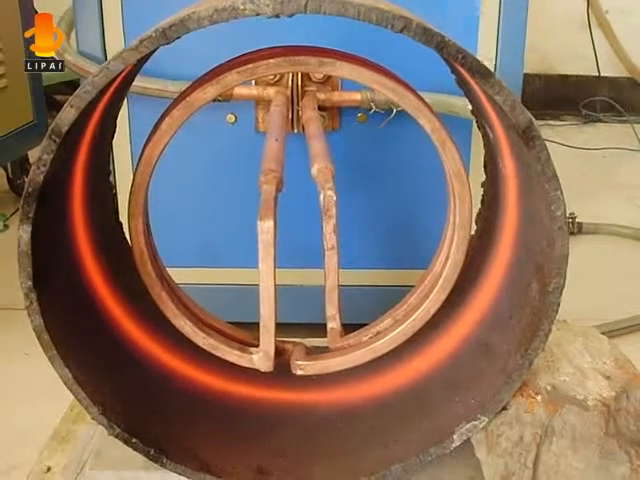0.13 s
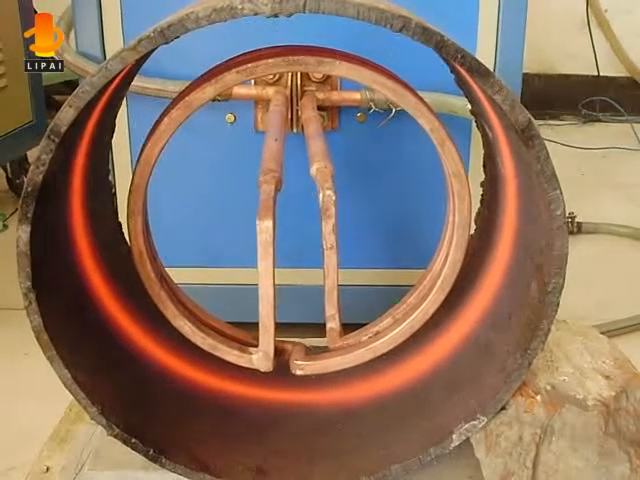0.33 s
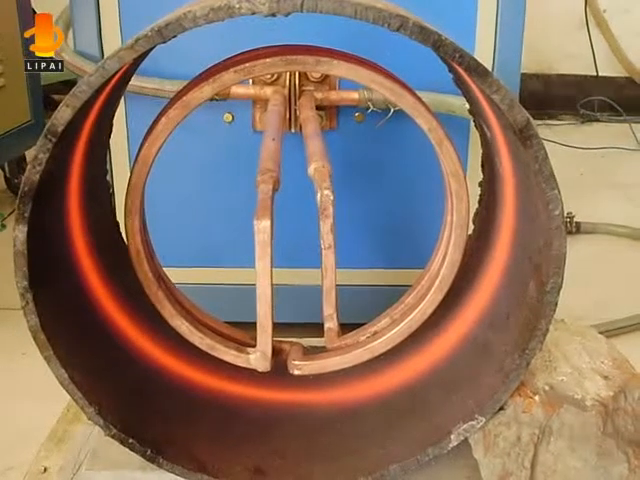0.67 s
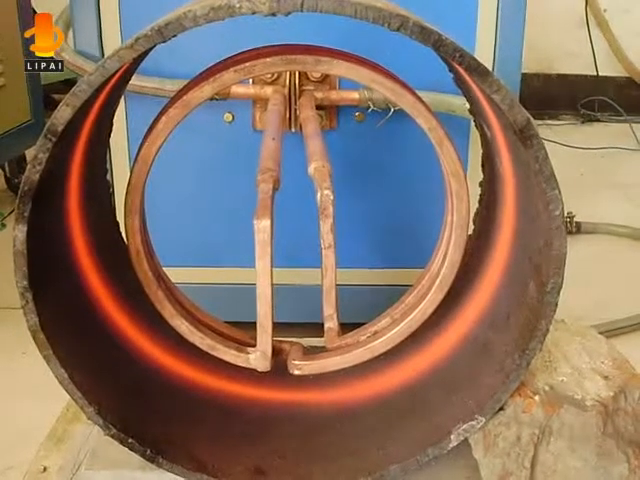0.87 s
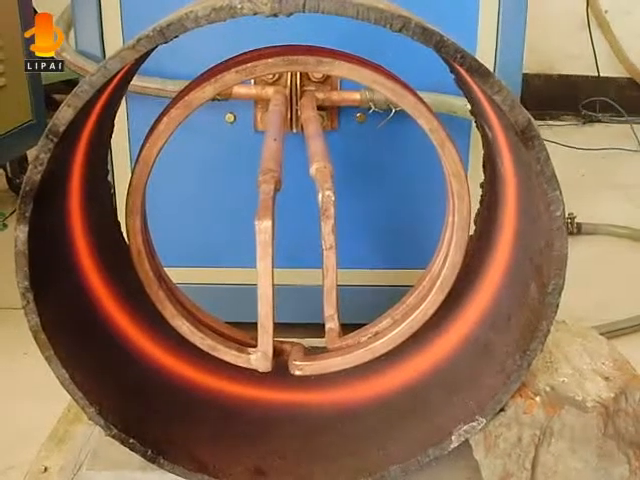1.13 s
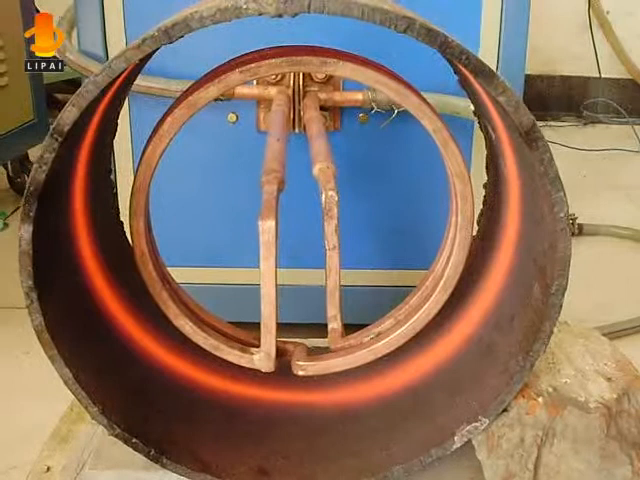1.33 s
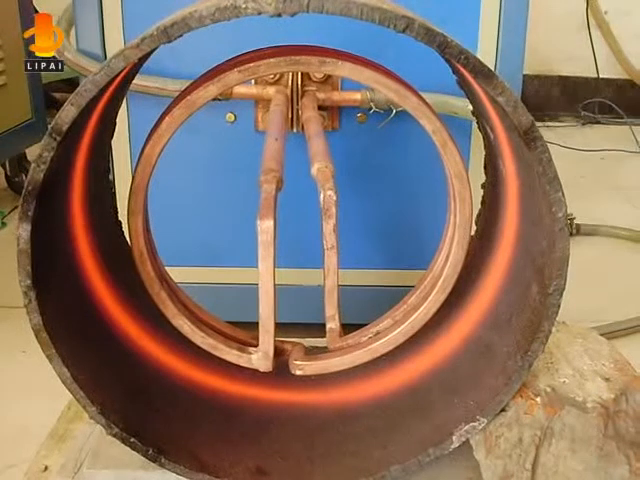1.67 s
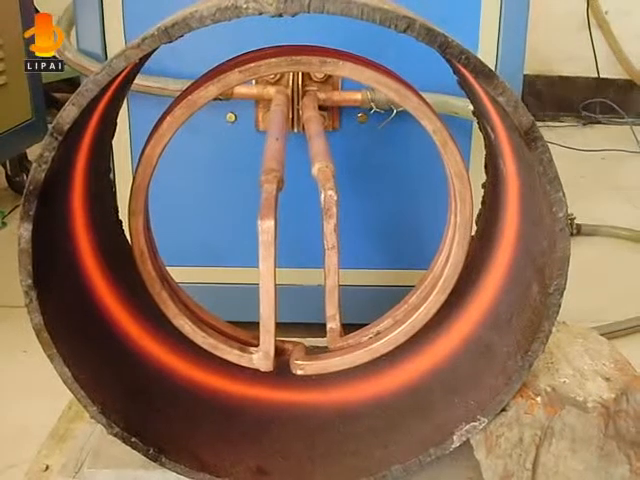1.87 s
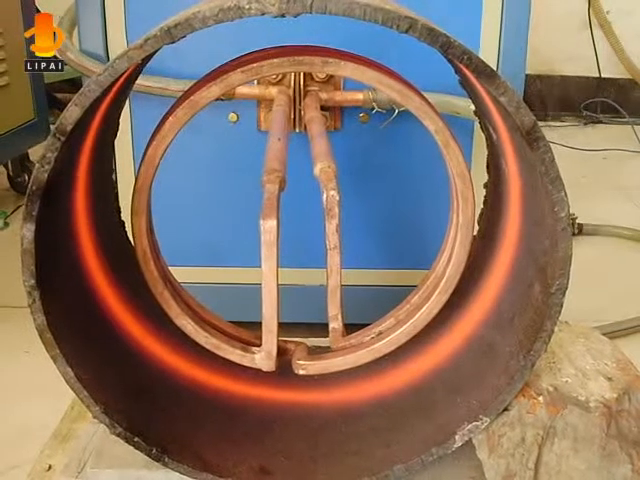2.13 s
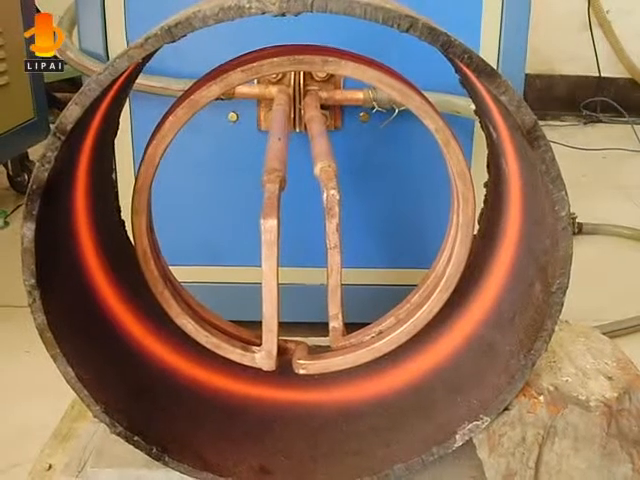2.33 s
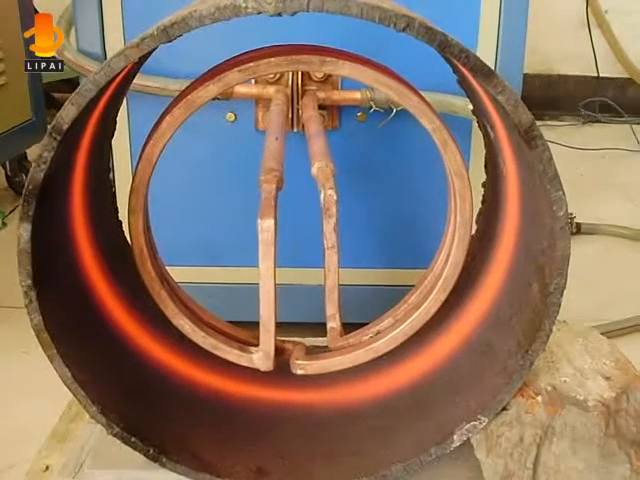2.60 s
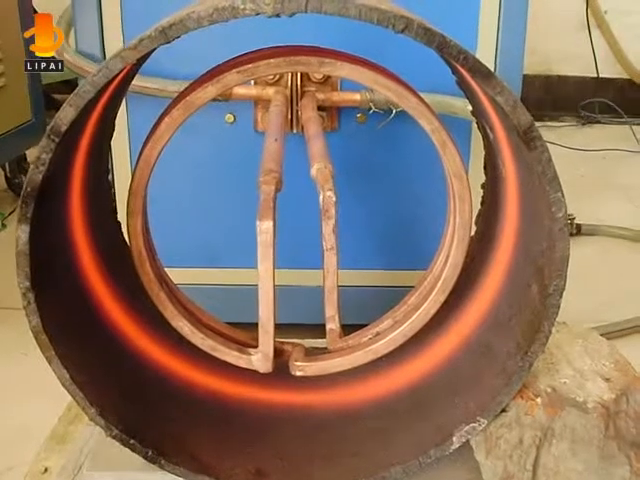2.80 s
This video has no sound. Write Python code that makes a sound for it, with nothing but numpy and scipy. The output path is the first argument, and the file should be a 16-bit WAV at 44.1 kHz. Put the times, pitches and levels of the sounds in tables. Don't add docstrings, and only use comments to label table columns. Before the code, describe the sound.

From 0 to about 3 seconds, an induction heater hums without pause: a dominant tone near 900 hertz, weaker 300 and 1200 hertz tones, and a rough, buzzing pump beat. Cooling air roars steadily beneath, flickering slightly, with hollow panel resonances near 800 to 950 hertz and faint fan singing. Treble is dull above 5 kilohertz. One short click falls near the middle, about 1.3 to 1.4 seconds; other electrical ticks are nearly inaudible.

```python
import sys
import numpy as np
from scipy import signal
from scipy.fft import rfft, irfft, next_fast_len
from scipy.io import wavfile

SR = 44100
rng = np.random.default_rng(int(sys.argv[2]) if len(sys.argv) > 2 else 0)


def voltage_ratio(level):
    return 10 ** (np.asarray(level, float) / 20)


def int16_out(signal):
    q = np.round(np.clip(np.atleast_2d(signal).T, -1, 1) * 32767)
    wavfile.write(sys.argv[1], SR, q.astype(np.int16))


N = 131418
LOST_AT, LOST_SAMPLES = 62767, 1024
N_ROOM = N + LOST_SAMPLES
HUM_BASE_HZ = 100.011

# (multiple of HUM_BASE_HZ [1], level [dB rms])
HUM_TONES = [(1, -52), (3, -42), (6, -47), (7, -52), (8, -47), (9, -22.2), (10, -48), (12, -38.3),
             (13, -59), (15, -53), (16, -48), (18, -55), (22, -60), (25, -61), (26, -60), (29, -65),
             (30, -66), (34, -66)]
# (hum multiple [1], shaft order [1], level [dB rms])
SIDE_TONES = [(9, -1, -28.5), (9, 1, -39.5), (9, 2, -52), (12, -1, -54), (12, -2, -52), (6, 1, -47),
              (6, -1, -54), (1, 1, -49), (15, -1, -63)]
# (frequency [Hz], level [dB rms])
BLADE_TONES = [(216.8, -41.5), (636.9, -46.5), (3333.7, -66), (3631, -70), (4368, -72), (4600, -72)]
# (frequency [Hz], width [Hz], level [dB rms])
PANEL_MODES = [(143.9, 6.6, -46.5), (297.2, 30, -37.5), (330.6, 17, -42), (348.8, 14, -38.5),
               (422.2, 39, -40), (501.4, 25, -50), (732, 14, -43.5), (800, 20, -37.5), (839.2, 17, -36),
               (888.9, 25.8, -30.5), (947, 17, -39.5), (1092, 29, -47), (1187, 91, -50), (2200, 400, -49)]
# (frequency [Hz], density [dB per Hz])
AIR_SPECTRUM = [(25, -13), (90, -5.5), (250, -1.5), (800, -1), (1150, -5.5), (1400, -12.5), (2500, -10),
                (5000, -29.5)]
# (frequency [Hz], gain [dB])
MIC_RESPONSE = [(3000, 0), (3650, -0.5), (3950, -8), (4400, -7), (4680, -10.5), (4850, -21), (5080, -23.5),
                (5250, -51)]
# (frequency [Hz], level [dB rms])
WHINE_TONES = [(9701, -101), (11499, -101), (13200, -110)]
# (time [s], hiss lift [dB])
TICK_EVENTS = [
    (.93, 2),
    (1.055, 10.5),
    (1.274, 3.5),
    (2.089, 3.5),
    (2.855, 8),
]


def rms_one(x):
    return x / np.sqrt(np.mean(x ** 2) + 1e-20)


def drift(rate_hz):
    r = np.exp(-80 * np.pi * rate_hz / SR)
    noise = rng.standard_normal(N_ROOM // 40 + 2002)
    slow = signal.lfilter([1], [1, -2 * r, r * r], noise)[2000:]
    slow = rms_one(slow - slow.mean())
    return np.interp(np.arange(N_ROOM) / 40, np.arange(len(slow)), slow)


def tone(phase_rad, level_db, flutter_db, flutter_hz):
    gain = np.sqrt(2) * voltage_ratio(level_db + flutter_db * drift(flutter_hz))
    return gain * np.sin(phase_rad)


def hum_phase(multiple, start_rad):
    t = np.arange(N_ROOM) / SR
    return 2 * np.pi * HUM_BASE_HZ * round(multiple) * t + start_rad[round(multiple)]


def transformer_hum(start_rad):
    flutter_db, flutter_hz = 1.0, 1.3
    return sum(tone(hum_phase(k, start_rad), db, flutter_db, flutter_hz) for k, db in HUM_TONES)


def pump_side_tones(start_rad):
    shaft_hz, wander_rad, wander_hz = 42.47, 0.35, 2.0
    upper_lag_turn, flutter_db, flutter_hz = 0.5, 1.5, 2.4
    t = np.arange(N_ROOM) / SR
    shaft_rad = 2 * np.pi * shaft_hz * t + wander_rad * drift(wander_hz)
    out = np.zeros(N_ROOM)
    for multiple, order, db in SIDE_TONES:
        phase_rad = hum_phase(multiple, start_rad) + round(order) * shaft_rad
        phase_rad += 2 * np.pi * upper_lag_turn * (order > 0)
        out += tone(phase_rad, db, flutter_db, flutter_hz)
    return out


def fan_blades():
    wander_rad, wander_hz, flutter_db, flutter_hz = 0.2, 1.9, 3.5, 2.3
    t = np.arange(N_ROOM) / SR
    out = np.zeros(N_ROOM)
    for hz, db in BLADE_TONES:
        phase_rad = 2 * np.pi * hz * t + wander_rad * drift(wander_hz)
        out += tone(phase_rad, db, flutter_db, flutter_hz)
    return out


def panel_resonances():
    settle = SR // 2
    out = np.zeros(N_ROOM)
    for hz, width_hz, db in PANEL_MODES:
        r = np.exp(-np.pi * width_hz / SR)
        poles = [1, -2 * r * np.cos(2 * np.pi * hz / SR), r * r]
        blown = rng.standard_normal(N_ROOM + settle)
        for _ in range(2):
            blown = signal.lfilter([1, 0, -1], poles, blown)
        out += voltage_ratio(db) * rms_one(blown[settle:])
    return out


def cooling_air():
    level_db, patchy_db, joint_hz, band_hz = -30.5, 0.5, 1.5, 13.0
    settle = SR // 2
    together = drift(joint_hz)
    edges_hz = 16 * 2 ** np.arange(0, 8.5, 1 / 3)
    white = rng.standard_normal((2, N_ROOM + settle))
    at_hz, density_db = np.transpose(AIR_SPECTRUM)
    out = np.zeros(N_ROOM)
    for k, (low, high) in enumerate(zip(edges_hz, edges_hz[1:])):
        sos = signal.butter(2, [low, high], "band", fs=SR, output="sos")
        band = signal.sosfilt(sos, white[k % 2])[settle:]
        db = np.interp(np.log(low * high) / 2, np.log(at_hz), density_db)
        flicker_db = patchy_db * (0.5 * together + drift(band_hz))
        out += band * voltage_ratio(db + flicker_db)
    return voltage_ratio(level_db) * rms_one(out)


def microphone(room):
    size = next_fast_len(N_ROOM)
    hz = np.arange(size // 2 + 1) * SR / size
    gain = voltage_ratio(np.interp(hz, *np.transpose(MIC_RESPONSE)))
    return irfft(rfft(room, size) * gain, size)[:N_ROOM]


def lose_block(heard):
    return np.delete(heard, np.arange(LOST_AT, LOST_AT + LOST_SAMPLES))


def joint_and_start_steps(dry):
    joint_step, first_sample, settle_s = -0.2, 0.21, 0.0004
    n = np.arange(N)
    from_joint = n - LOST_AT + 0.5
    missing_step = joint_step - (dry[0, LOST_AT] - dry[0, LOST_AT - 1])
    joint = missing_step / 2 * np.sign(from_joint) * np.exp(-abs(from_joint) / SR / settle_s)
    start = (first_sample - dry[0, 0]) * np.exp(-n / SR / settle_s)
    return joint + start


def electronic_whines():
    t = np.arange(N_ROOM) / SR
    flutter_db, flutter_hz = 3.0, 40.0
    return sum(tone(2 * np.pi * hz * t, db + 1.0, flutter_db, flutter_hz)[:N] for hz, db in WHINE_TONES)


def hiss_and_ticks():
    self_noise_db, tick_s = -96, 0.014
    t = np.arange(N) / SR
    lift_db = sum(db * np.exp(-((t - at_s) / tick_s) ** 2) for at_s, db in TICK_EVENTS)
    return voltage_ratio(self_noise_db + lift_db) * rng.standard_normal((1, N))


def scene():
    start_rad = rng.uniform(0, 2 * np.pi, 40)
    machine = transformer_hum(start_rad) + pump_side_tones(start_rad) + fan_blades()
    air = panel_resonances() + cooling_air()
    return lose_block(microphone(machine + air))[None]


def band_limit(x):
    return signal.sosfilt(signal.butter(12, 15850, fs=SR, output="sos"), x)


def record(dry):
    dc_offset = -0.0038
    noise = hiss_and_ticks() + electronic_whines()
    mix = dry + joint_and_start_steps(dry) + dc_offset + noise
    return band_limit(mix)


dry = scene()
out = record(dry)
int16_out(out)
```